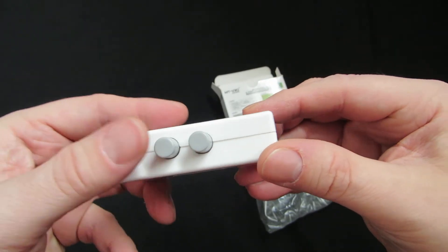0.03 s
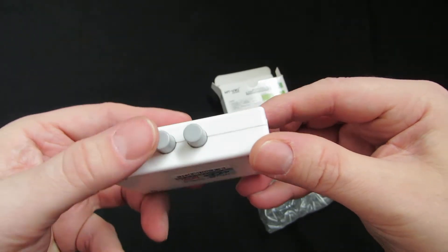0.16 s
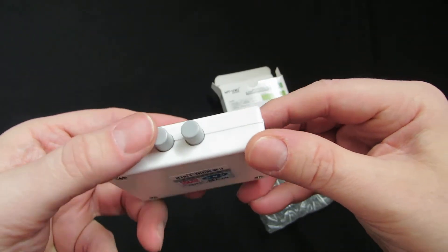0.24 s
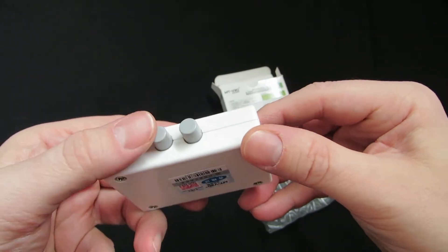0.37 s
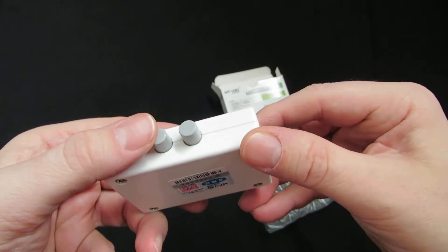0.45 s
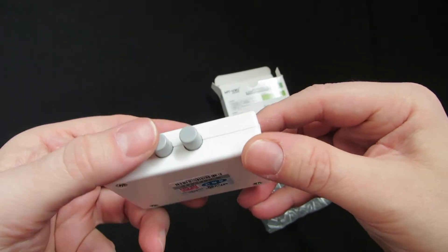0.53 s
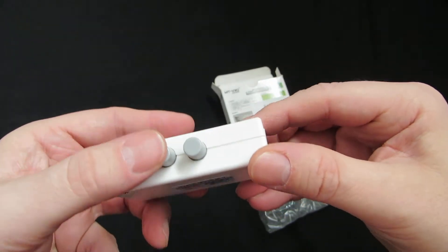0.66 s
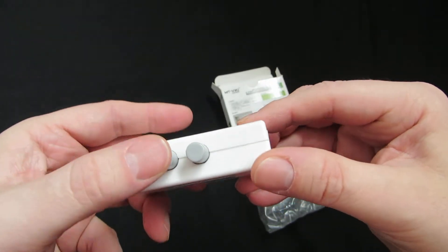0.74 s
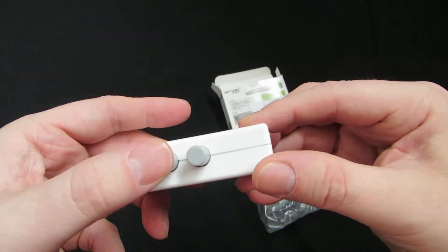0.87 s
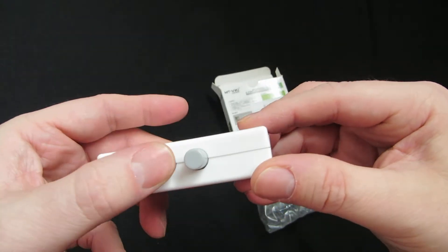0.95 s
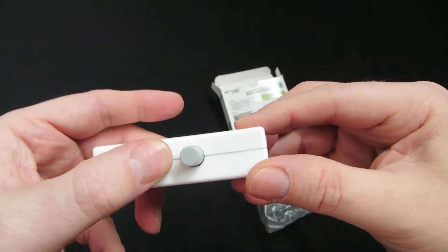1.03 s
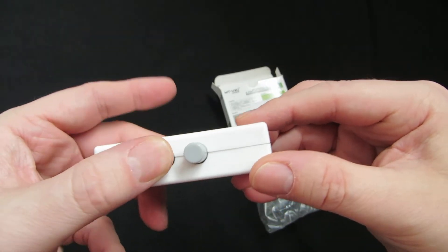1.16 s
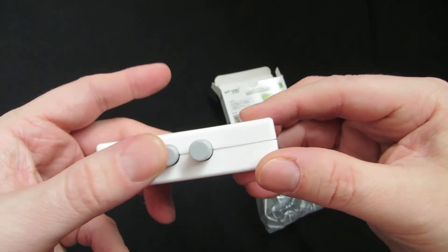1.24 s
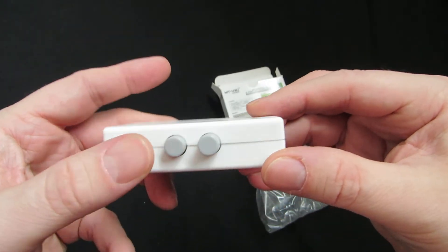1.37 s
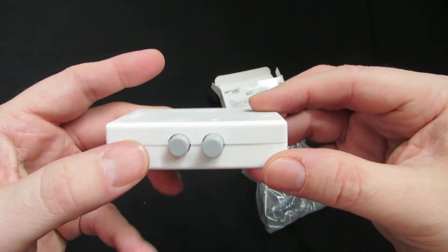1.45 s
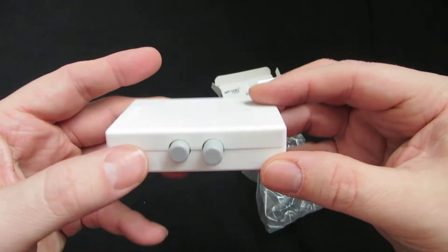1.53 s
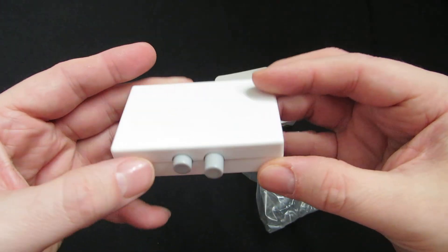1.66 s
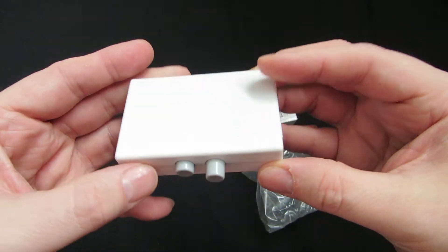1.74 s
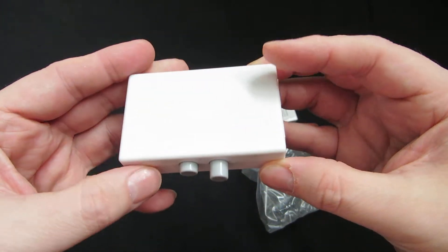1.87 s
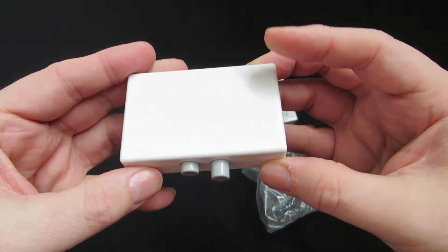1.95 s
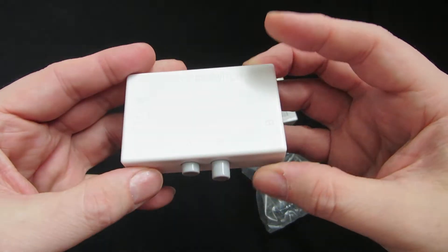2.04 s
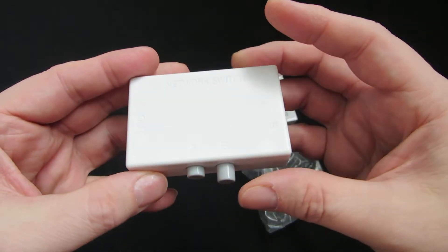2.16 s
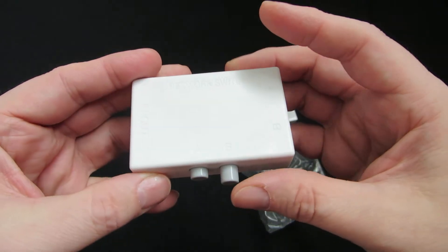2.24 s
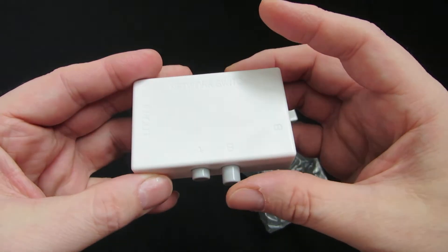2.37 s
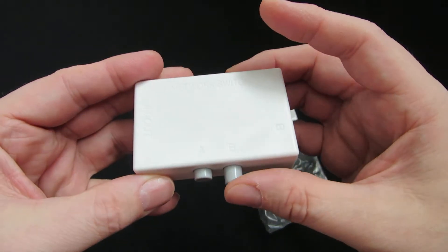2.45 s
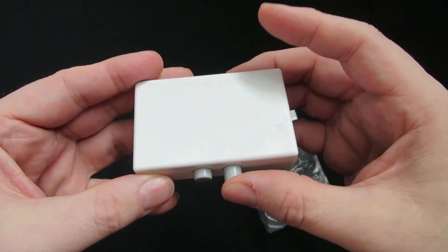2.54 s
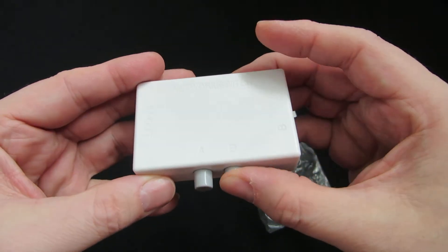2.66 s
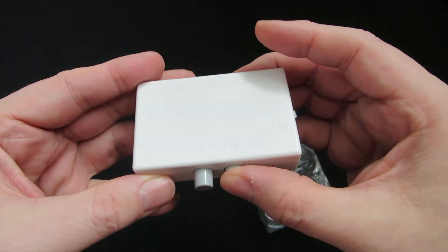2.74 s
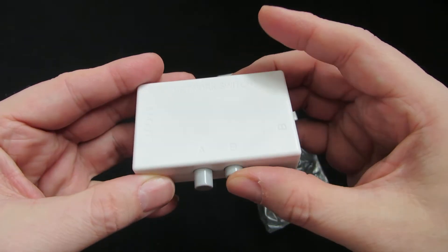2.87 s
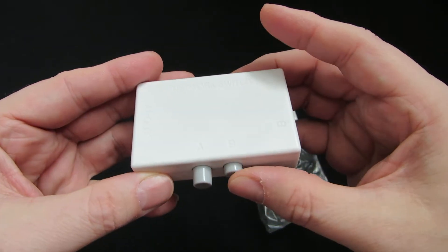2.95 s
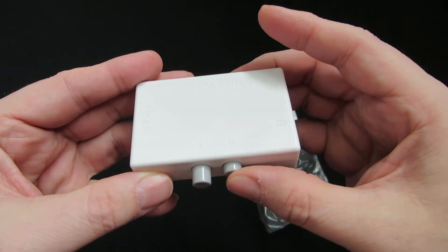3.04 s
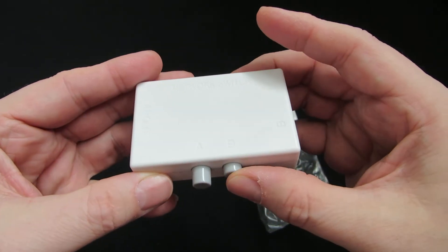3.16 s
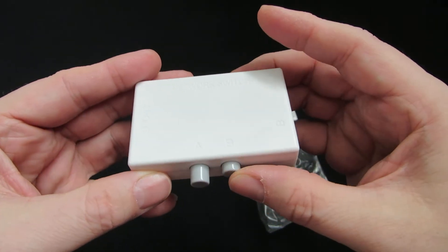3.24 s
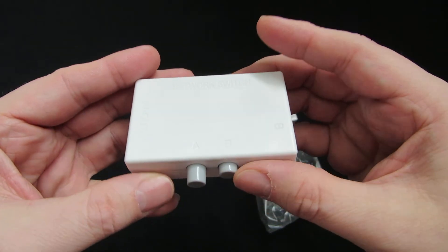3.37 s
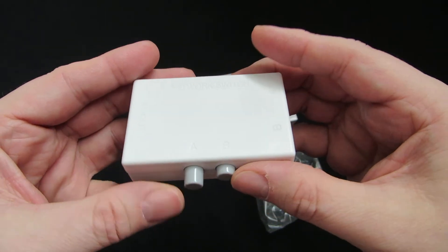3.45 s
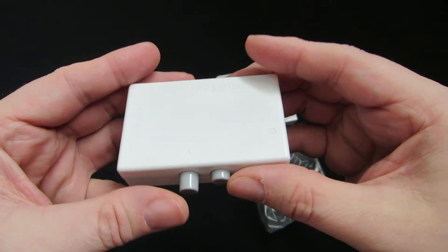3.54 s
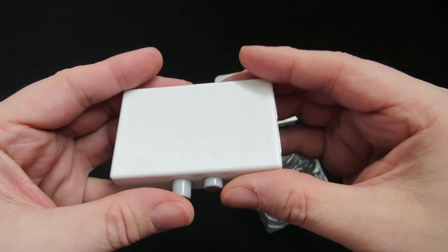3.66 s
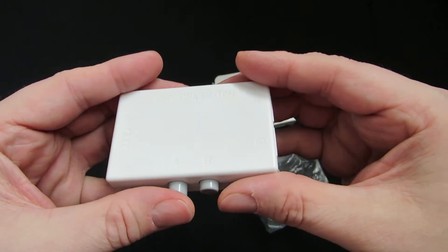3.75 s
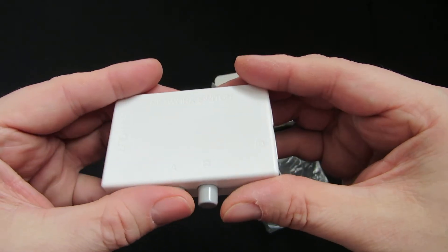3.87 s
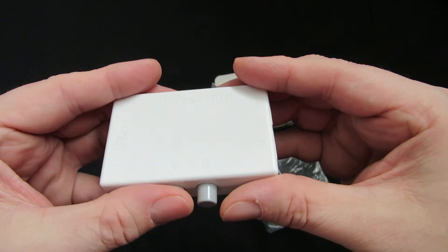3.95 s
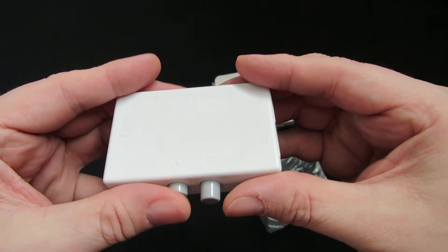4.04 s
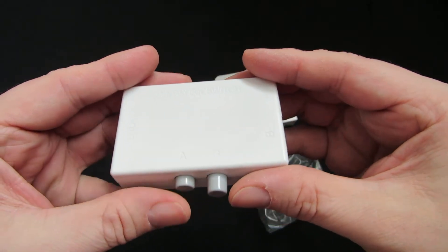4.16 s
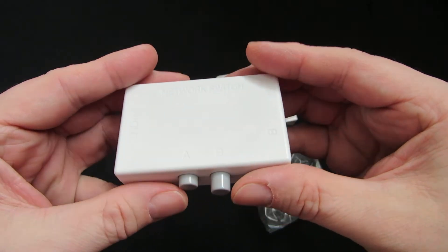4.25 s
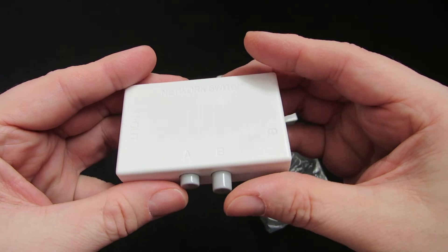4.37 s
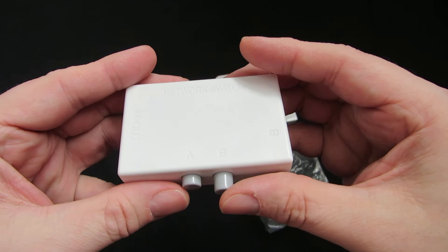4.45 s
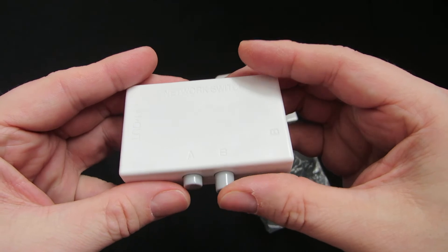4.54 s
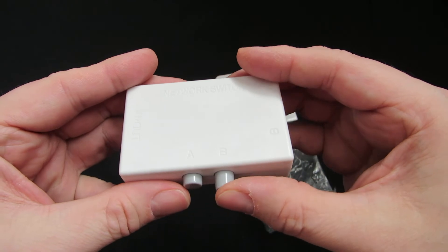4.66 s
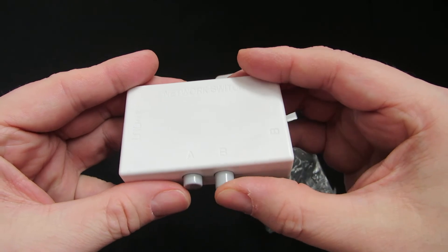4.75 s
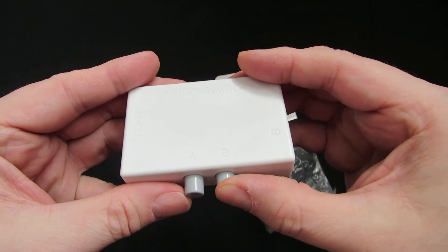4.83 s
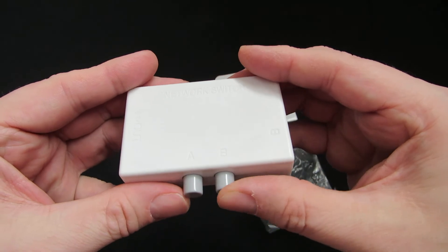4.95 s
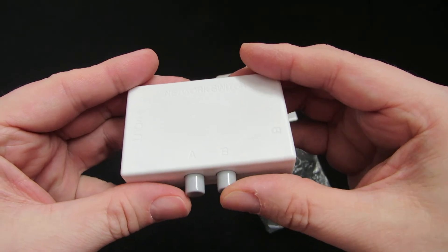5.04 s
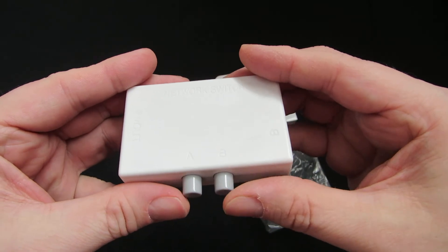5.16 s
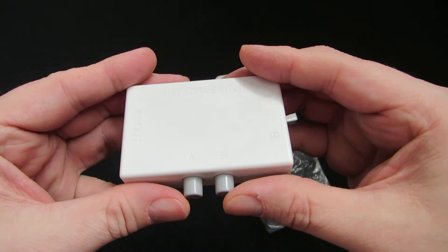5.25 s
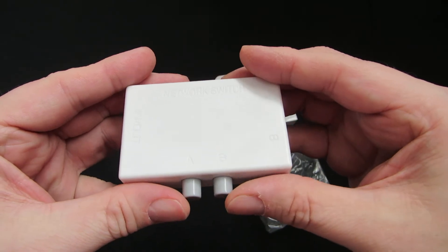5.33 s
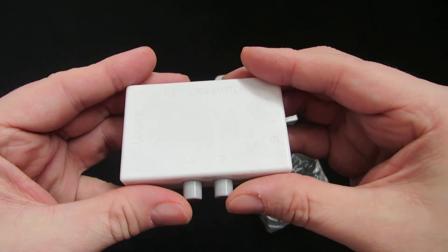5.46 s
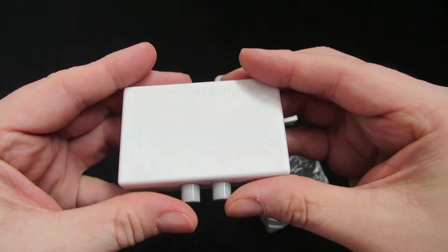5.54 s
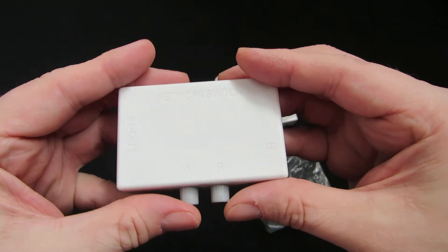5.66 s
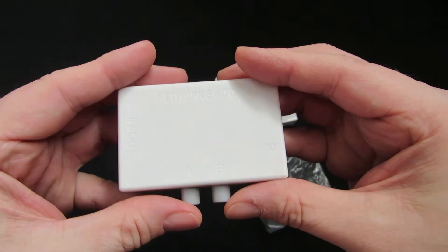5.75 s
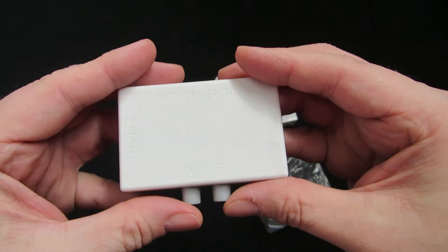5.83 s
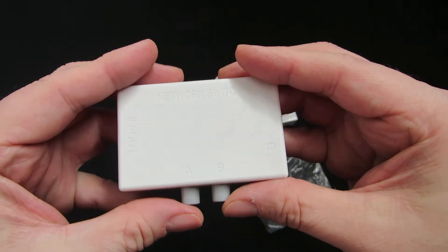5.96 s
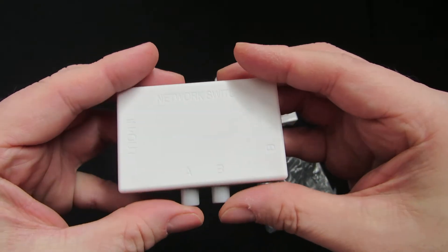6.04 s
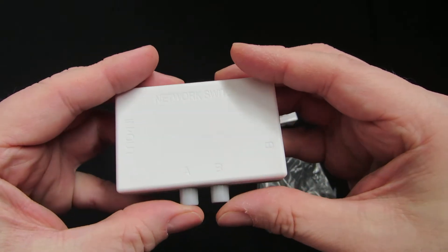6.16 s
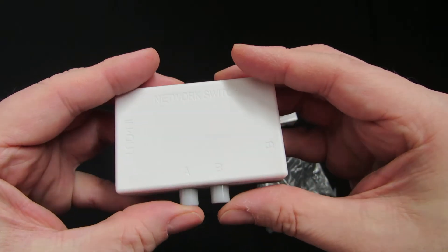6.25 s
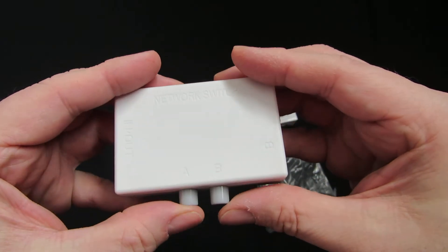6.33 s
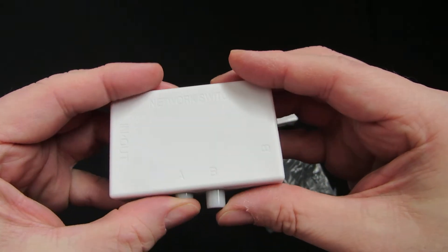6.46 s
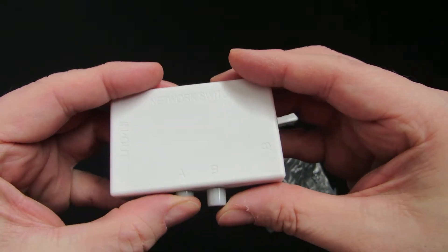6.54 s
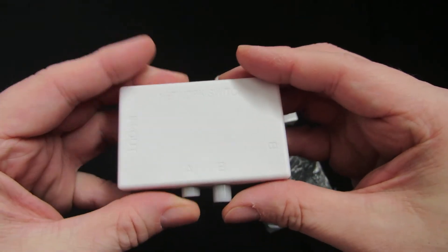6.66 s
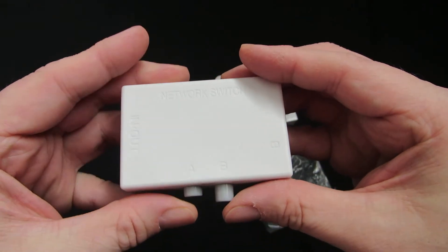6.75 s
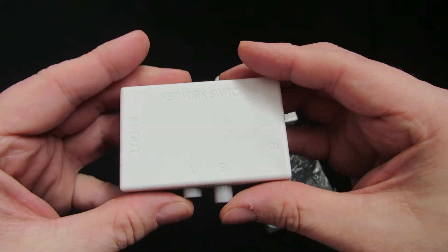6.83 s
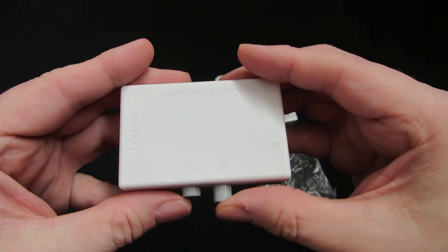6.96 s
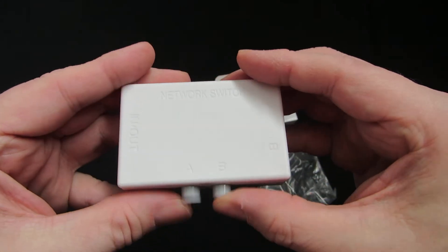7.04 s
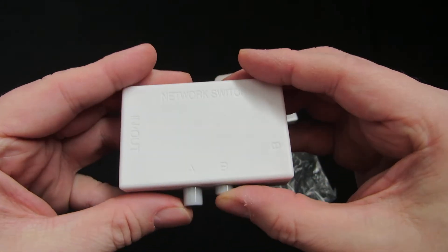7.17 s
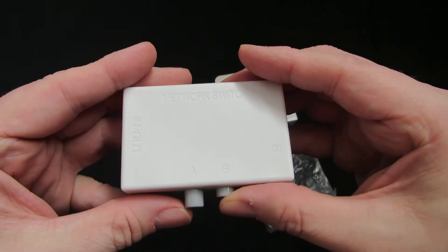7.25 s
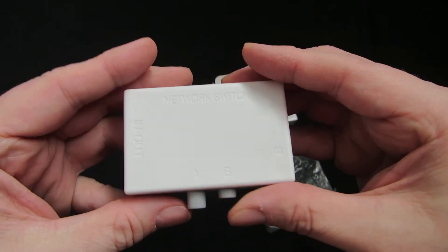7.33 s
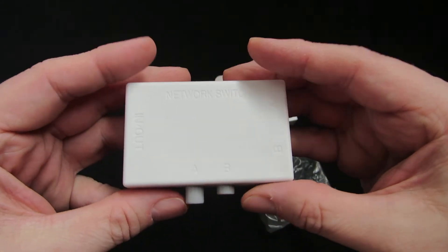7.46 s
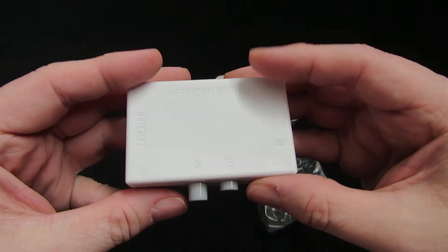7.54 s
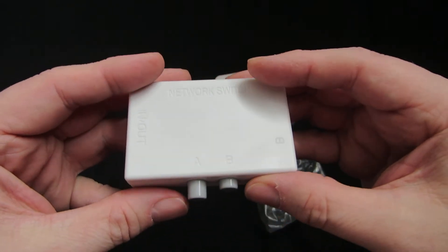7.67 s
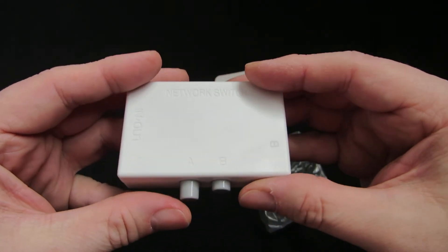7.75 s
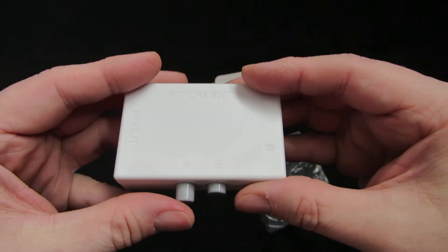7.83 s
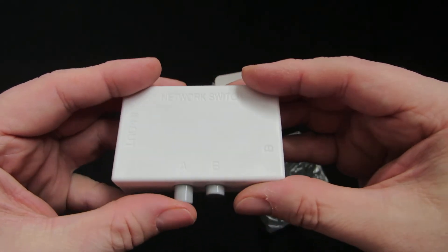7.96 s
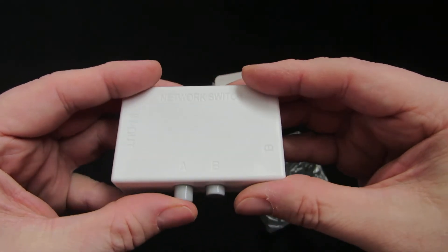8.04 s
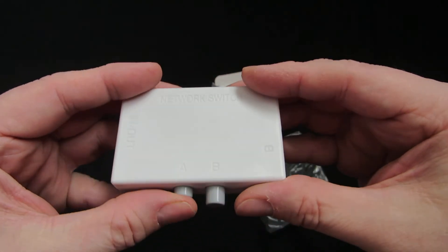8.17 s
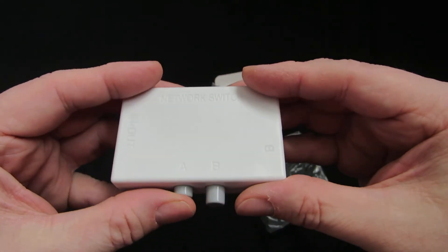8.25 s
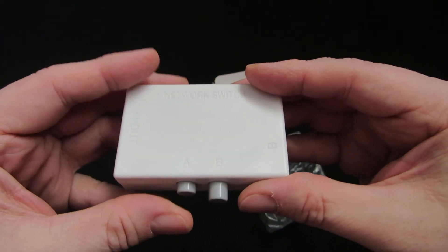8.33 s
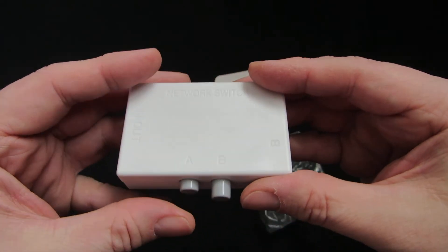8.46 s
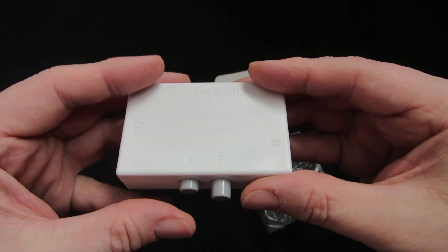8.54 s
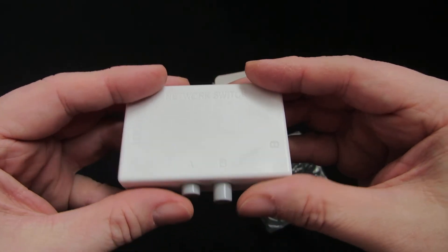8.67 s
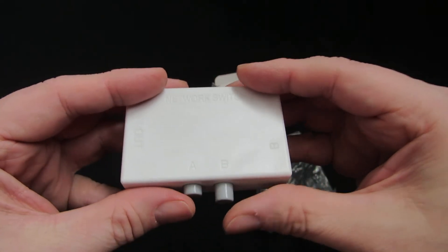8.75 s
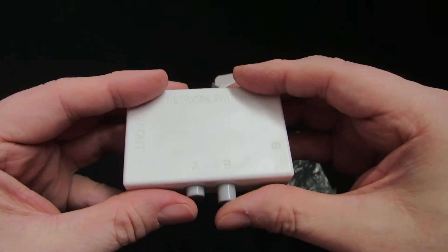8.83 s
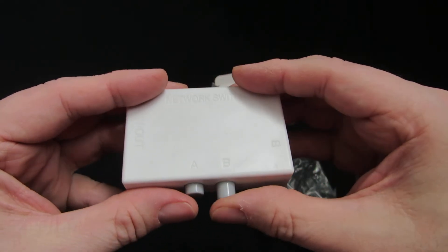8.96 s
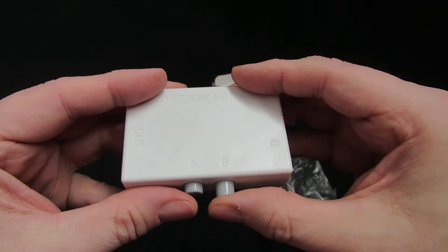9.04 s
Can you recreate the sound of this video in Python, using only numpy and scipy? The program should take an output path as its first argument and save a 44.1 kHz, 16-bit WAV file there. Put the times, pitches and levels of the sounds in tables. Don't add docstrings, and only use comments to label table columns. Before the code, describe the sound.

A quiet room with soft, wide, airy hiss, captured very close by a small camera microphone with little bass. Faint plastic scraping opens the scene, then tiny ticks at 0.9 lead to a medium double snap at 1.0 and a light tick pair at 1.2. At 2.7 a hard, clipped clack rings the hollow case, with small rebounds and a thin spring tone lingering until about 3.4. Another loud snap at 3.9 leaves a clearer high spring ring, fading near 4.6. A strong snap at 4.85 is followed by a release tick at 5.0 and a brief ring. After a pause, medium clicks come at 6.45, with ticks at 6.65, then a close pair at 7.1 and ticks at 7.2. A final loud clack at 8.2 has quick rebounds and a fading spring ring. Gritty plunger slides precede the snaps; short room reflections answer, and the hiss dips after the loudest ones.

```python
import sys
import numpy as np
from scipy import signal
from scipy.fft import rfft, irfft, next_fast_len
from scipy.io import wavfile

SR = 44100
rng = np.random.default_rng(int(sys.argv[2]) if len(sys.argv) > 2 else 0)


def linear_from_db(decibels):
    return 10 ** (np.asarray(decibels, float) / 20)


def waveform_to_disk(signal):
    frames = np.transpose(np.atleast_2d(signal))
    scaled = np.clip(frames, -1, 1) * 32767
    samples = np.round(scaled).astype(np.int16)
    wavfile.write(sys.argv[1], SR, samples)


N = 401310
T = np.arange(N) / SR

# f/Hz, t60/ms, level/dB
CASE_MODES = [(754, 24, -17), (819, 25, -10), (965, 8, -6.5), (1276.5, 11, 2.5), (1515.5, 17, 0.5),
              (1586, 14, -6), (2040, 16, -8.5), (2460, 9.1, -9), (2950, 10, -4), (3213, 11, -3),
              (3735, 15, -1.5), (4260, 10, -3.5), (4980, 4.5, -2.5), (5300, 3.2, -2.5), (5780, 2.4, -7),
              (6320, 6.4, 0.5), (6900, 4.4, 0), (7780, 8.3, -1), (9110, 7.4, -1.5), (10160, 6.9, -4),
              (12400, 3.6, -6.5), (13100, 0.42, -9), (14700, 1.2, -9)]
# from f/Hz, to f/Hz
GROUP_BANDS = [(650, 1900), (1900, 6100), (6100, 15000)]
# peak level/dB, first touch to blow/ms, loudest resonance level/dB, blow over chatter level/dB
TOUCH = [(-32, 0.78, 11.5, 9.5), (-22, 0.54, 6.5, 7.5), (-8, .9, 2, 6.5), (-1, 1.7, 2, 18)]
# t/s of the crest, peak level/dB at 2-6 kHz, loudest resonance f/Hz, chatter/ms
SNAPS = [(1.009, -6.5, 4000, 4.5), (1.0119, -9, 4817, 2.9), (2.6825, 3.5, 2950, 2.3),
         (3.9259, 3.1, 4110, 1.8), (4.8572, 0.27, 3046, 1.8), (6.4507, -4, 3205, 4.5),
         (7.1051, -3.5, 3260, 1), (7.135, -8.5, 3503, 3.5), (8.2015, 1.48, 4240, 1.4)]
# t/s, peak level/dB, loudest resonance f/Hz, low modes level/dB, high modes level/dB
TICKS = [(0.907, -33, 3900, -24.5, -4), (0.9694, -21.5, 3960, -28, -12.5), (0.973, -22, 6070, -10.5, -2),
         (1.228, -19, 3500, -5, -11.5), (1.2348, -18, 4700, -7, -12.5), (2.6198, -34.5, 4200, 0.5, -11.5),
         (2.6437, -28, 3430, -19.5, -20), (2.8167, -34.5, 4320, -1.5, -5.5), (4.746, -35, 4260, -10.5, -27),
         (4.9799, -21, 3110, -11, -14), (6.3983, -18, 3020, -11, -5.5), (6.4345, -33, 3090, -5.5, 8.5),
         (6.668, -18, 3030, -6.5, -13), (7.0284, -42.5, 3570, 1.5, -4.5), (7.0597, -31, 3280, -25, -20.5),
         (7.2103, -32.5, 4830, -4.5, -7.5), (7.2376, -22, 4940, -5.5, 2.5)]
# t/s, peak level/dB, loudest resonance f/Hz, low modes level/dB
SCUFFS = [(1.223, -33.5, 4600, 3.5), (2.7131, -19, 2730, -18), (2.722, -20, 3730, -6.5),
          (2.8209, -29, 3385, -13), (4.0193, -42, 2164, -2.6), (6.4286, -35.5, 3060, 5),
          (6.6578, -32, 3130, 0), (6.6645, -16, 3100, -9), (7.2334, -24, 2960, -8),
          (8.2247, -20, 3380, -15), (8.2283, -18.5, 3080, -5)]
# t/s of arrival, travel/s, level/dB on arrival
STROKES = [(0.061, 0.13, -51), (1.002, 0.042, -34), (1.225, 0.016, -43.5), (2.678, 0.069, -42.5),
           (3.92, .04, -39.5), (4.849, .07, -62), (4.976, 0.03, -34), (6.44, 0.067, -36.5),
           (6.66, 0.035, -47.5), (7.1, 0.1, -46.5), (8.191, 0.045, -48)]
LEFT_PARTIALS = (1453, 2159, 2912, 4366)
RIGHT_PARTIALS = (1470, 2196, 2939)
# t60/s, swell/s, fade once touched/(dB/s)
LEFT_COIL = [(3.1, 0.044, 46), (1.8, 0.031, 250), (2.1, .07, 248.5), (2, .07, 250)]
RIGHT_COIL = [(3.7, 0.059, 230), (0.78, 0.033, 250), (3.4, 0.03, 250)]
# t/s, t/s when finger or seat damps it, first, second and third partial level/dB
LEFT_FREED = [(2.729, 3.45, -54, -47.5, -50), (4.897, 5.19, -50.5, -54.5, -48.5)]
RIGHT_FREED = [(1.05, 1.5, -75, -56.5, -91), (3.96, 4.646, -50.5, -39.5, -62.5),
               (6.5, 6.659, -76.5, -60, -80), (8.25, 9.3, -54, -41, -80)]
# t/s, turned down by/dB, jolt of the overloaded amplifier level/dB
DUCKS = [(1.01, 0.5, -44), (2.681, 10, -25), (3.925, 10.5, -22.5), (4.86, 9, -28.5), (6.452, -1, -56.5),
         (7.105, 1.5, -32.5), (8.202, 10, -18)]
# f/Hz, level/dB per Hz
HISS_SIDE = [(12, -46), (20, -11), (68, -4.5), (277, -4), (356, -3), (471, -5.5), (825, -2.5), (6910, -20),
             (13900, -31.5), (16000, -46)]
HISS_MID = [(12, -35), (20, -7.5), (55, -1), (215, -5), (366, -4), (573, -7), (1000, -1), (1290, -6),
            (1480, -8), (1610, -8.5), (4940, -12), (11100, -18.5), (16000, -24.5)]
# f/Hz, level/dB
ROOM_COLOUR = [(600, -26.5), (1200, -24.5), (2500, -22), (5000, -29), (9000, -23.5), (16000, -40.5)]


def colour(x, points):
    n = next_fast_len(len(x))
    hz, db = np.transpose(points)
    log_hz = np.log(np.arange(n // 2 + 1) * SR / n + 1)
    gain = linear_from_db(np.interp(log_hz, np.log(hz), db))
    return irfft(rfft(x, n) * gain, n)[:len(x)]


def level(x, db):
    return x * linear_from_db(db) / np.sqrt(np.mean(x ** 2))


def hiss():
    whine_hz, whine_db = 1012, -68.5
    side = level(colour(rng.standard_normal(N), HISS_SIDE), -46)
    mid = level(colour(rng.standard_normal(N), HISS_MID), -59)
    mid += linear_from_db(whine_db) * np.sin(2 * np.pi * whine_hz * T)
    opposed = linear_from_db(np.array([[-0.25], [0.25]])) * np.array([[1], [-1]])
    return mid + side * opposed


def case_ring(chance, loudest_hz, loudest_db, thud_db=0):
    loudest_ms, scatter_db, detune = 9, 2.7, 0.029
    hz, ms, db = np.transpose(CASE_MODES)
    two_lowest = np.arange(len(hz)) < 2
    db = np.append(db + scatter_db * chance[0] + thud_db * two_lowest, loudest_db)
    hz = np.append(hz * (1 + detune * chance[1]), loudest_hz)
    ms = np.append(ms, loudest_ms)
    t = T[:1024]
    fade = linear_from_db(db[:, None] - 60 * np.outer(1000 / ms, t))
    modes = fade * np.sin(2 * np.pi * np.outer(hz, t))
    modes[3::2] *= -1
    group = np.digitize(hz, (1900, 6100))
    return [modes[group == k].sum(axis=0) for k in range(3)]


def slides():
    rise_db, stop_db_per_s = 22.5, 2200
    grit = rng.standard_normal(N) * linear_from_db(4.3 * rng.exponential(size=N))
    low, middle, high = case_ring(np.zeros((2, len(CASE_MODES))), 3200, loudest_db=-9)
    ring = linear_from_db(-4) * low + middle + linear_from_db(-3.5) * high
    body = level(signal.fftconvolve(grit, ring)[:N], 0)
    travelling = np.zeros(N)
    for s, travel, db in STROKES:
        speeding_up = rise_db * (T - s) / travel
        stopped = stop_db_per_s * (s - T)
        travelling += linear_from_db(db + np.minimum(speeding_up, stopped))
    return body * travelling


def room(x):
    t60, treble_t60, side_db = 0.22, 0.22, -9.5
    t = T[:SR // 2]
    noise = rng.standard_normal((2, len(t)))
    bass = signal.sosfilt(signal.butter(1, 3000, fs=SR, output="sos"), noise)
    tail = bass * linear_from_db(-60 * t / t60) + (noise - bass) * linear_from_db(-60 * t / treble_t60)
    tail *= np.clip(t / 0.007, 0, 1) * linear_from_db(-12.5)
    mid, side = (colour(signal.fftconvolve(x, h)[:N], ROOM_COLOUR) for h in tail)
    return mid + linear_from_db(side_db) * side * np.array([[1], [-1]])


def gain_db():
    attack, hold, release = 0.058, 0.2, 0.43
    out = np.zeros(N)
    for s, db, _ in DUCKS:
        t = np.maximum(T - s, 0)
        back = np.maximum(t - hold, 0) / release
        out = np.minimum(out, -db * (1 - np.exp(-t / attack)) * np.exp(-back ** 1.5))
    return out


def contacts():
    body_db, body_per_db, snap_edge_db = -7.5, 0.29, -5.5
    tick_ms, scuff_ms, scuff_edge_db = 2.6, 5.5, -4.5
    snaps = [(s, db, hz, body_db + body_per_db * db, snap_edge_db, ms) for s, db, hz, ms in SNAPS]
    ticks = [(*row, tick_ms) for row in TICKS]
    scuffs = [(*row, scuff_edge_db, scuff_ms) for row in SCUFFS]
    return snaps + ticks + scuffs


def chatter(lead, ms):
    lead_in_db, rattle_db, rattle_t60 = -4, -10, 0.03
    t = T[:1024] - lead
    impacts = rng.standard_normal(len(t)) * linear_from_db(3.1 * rng.exponential(size=len(t)))
    growing = lead_in_db * -t / lead
    dropping = -8000 * t / max(ms - 0.9, 0.2)
    burst = impacts * linear_from_db(np.where(t < 0, growing, dropping))
    return burst + (t > 0) * impacts * linear_from_db(rattle_db - 60 * t / rattle_t60)


def clicks():
    first_touch_db = -17
    contact_db = -7.5
    group_chatter_db = (-9.5, -7.5, 0)
    ringing, crack, gain = np.zeros(N + 4096), np.zeros(N + 4096), gain_db()
    touch_db, lead_ms, loudest_db, blow_db = np.transpose(TOUCH)
    thud_db = (8, 8, 1.5, 0)
    impulse = signal.unit_impulse(512)
    bands = [signal.sosfilt(signal.butter(2, b, "band", fs=SR, output="sos"), impulse) for b in GROUP_BANDS]
    for s, db, hz, low_db, high_db, ms in contacts():
        lead = 0.001 * np.interp(db, touch_db, lead_ms)
        burst = chatter(lead, ms)
        blow = signal.unit_impulse(len(burst), int(lead * SR))
        blow *= linear_from_db(np.interp(db, touch_db, blow_db) + 8.5)
        blow[0] += linear_from_db(first_touch_db) * blow.max()
        i = int((s - lead - 0.0005) * SR)
        chance = rng.standard_normal((2, len(CASE_MODES)))
        rings = case_ring(chance, hz, np.interp(db, touch_db, loudest_db), np.interp(db, touch_db, thud_db))
        for ring, band, rel_db, chatter_db in zip(rings, bands, (low_db, 0, high_db), group_chatter_db):
            ring[:len(band)] += linear_from_db(contact_db) * band * np.linalg.norm(ring) / np.linalg.norm(band)
            y = signal.fftconvolve(blow + linear_from_db(chatter_db) * burst, ring)
            y *= linear_from_db(db + rel_db - gain[i]) / np.abs(y).max()
            ringing[i:i + len(y)] += y
            crack[i:i + len(band)] += band * np.linalg.norm(y) / np.linalg.norm(band)
    return ringing[:N], crack[:N]


def jolts():
    out = np.zeros(N)
    s, _, db = np.transpose(DUCKS)
    out[(s * SR).astype(int)] = linear_from_db(db)
    pulse = np.exp(-((T[:257] - T[128]) / 0.00018) ** 2)
    return np.convolve(out, pulse, "same") * linear_from_db(np.array([[-6], [3]]))


def springs():
    fourth_db = -11
    out, t = np.zeros(N + 2 * SR), T[:SR + SR // 4]
    left = (LEFT_PARTIALS, LEFT_COIL, LEFT_FREED)
    right = (RIGHT_PARTIALS, RIGHT_COIL, RIGHT_FREED)
    for partials_hz, coil, freed in (left, right):
        for start, stop, *levels_db in freed:
            i = int(start * SR)
            touched = np.maximum(t + start - stop, 0)
            levels_db = levels_db + [levels_db[-1] + fourth_db]
            for hz, db, (t60, swell, damp) in zip(partials_hz, levels_db, coil):
                shape = (1 - np.exp(-t / swell)) * linear_from_db(db - 60 * t / t60 - damp * touched)
                out[i:i + len(t)] += np.sqrt(2) * shape * np.sin(2 * np.pi * hz * t)
    return out[:N]


def scene():
    pan_db, bass_cut_hz = -4, 748
    ring_to_room_db, crack_to_room_db = -7, -1.5
    ringing, crack = clicks()
    hits = ringing + slides()
    box = hits + springs()
    edge = linear_from_db(-23) * np.roll(np.gradient(box), 7)
    near = np.array([(box + edge) * linear_from_db(pan_db / 2), (box - edge) * linear_from_db(-pan_db / 2)])
    far = room(linear_from_db(ring_to_room_db) * hits + linear_from_db(crack_to_room_db) * crack)
    cut = signal.cheby1(4, 0.3, bass_cut_hz, "high", fs=SR, output="sos")
    return signal.sosfilt(np.vstack([cut, cut]), near + far) + hiss()


def band_limit(x):
    return signal.sosfilt(signal.butter(12, 16130, fs=SR, output="sos"), x)


def record(dry):
    coupling_hz = 447
    loud = dry * linear_from_db(gain_db())
    drain = signal.butter(2, coupling_hz, "high", fs=SR, output="sos")
    tops = signal.sosfiltfilt(drain, loud - np.clip(loud, -0.97, 0.97))
    converter_hiss = level(colour(rng.standard_normal(N), HISS_MID), -69.5)
    return band_limit(loud - tops + jolts() + converter_hiss)


dry = scene()
out = record(dry)
waveform_to_disk(out)
```